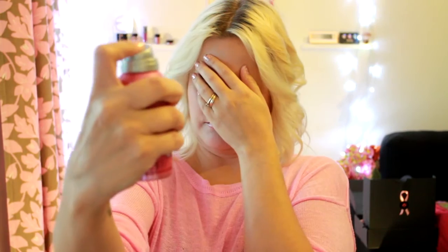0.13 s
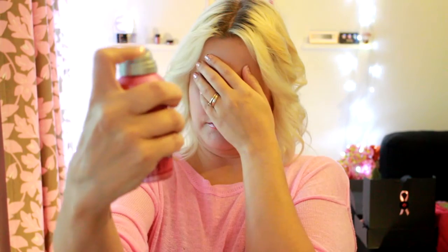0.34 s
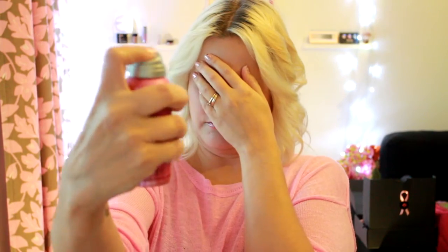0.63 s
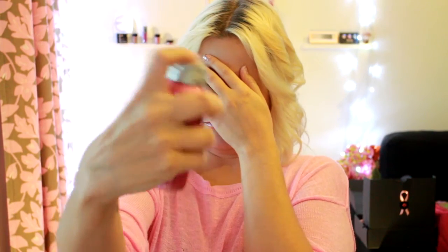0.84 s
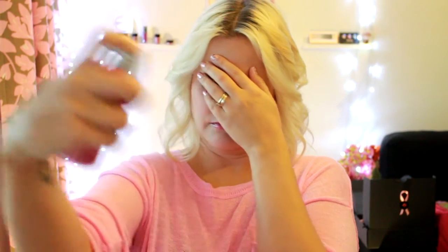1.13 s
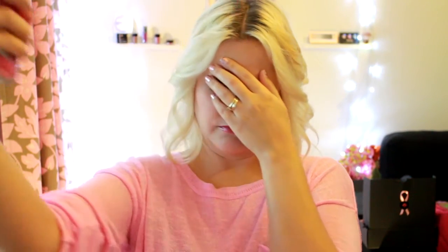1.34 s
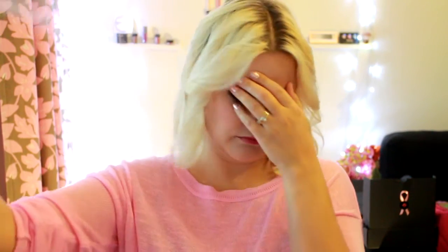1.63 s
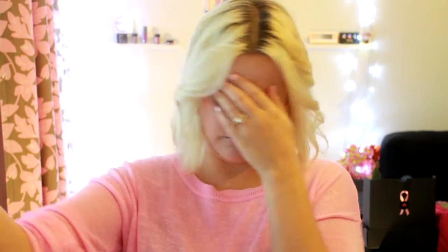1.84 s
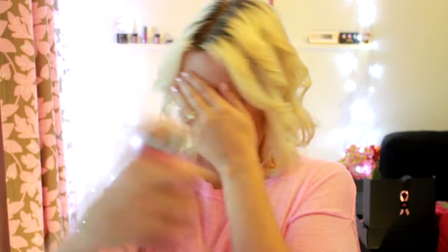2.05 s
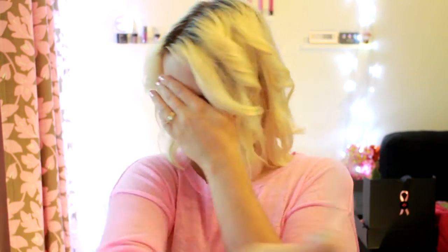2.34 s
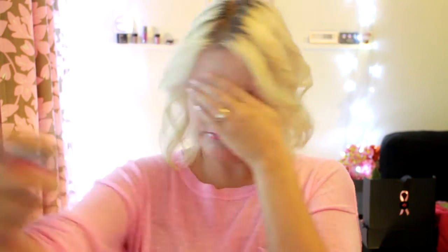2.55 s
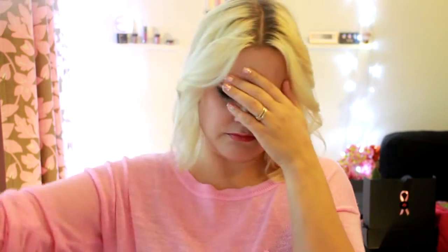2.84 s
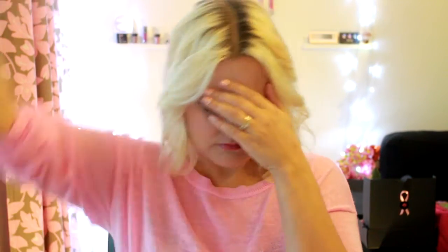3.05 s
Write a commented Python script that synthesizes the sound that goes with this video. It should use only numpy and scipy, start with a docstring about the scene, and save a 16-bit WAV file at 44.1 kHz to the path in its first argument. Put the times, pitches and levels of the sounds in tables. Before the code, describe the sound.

Close aerosol hairspray: a nozzle click, four quick hissing puffs and a longer hiss.

```python
"""A can of hairspray, close to the microphone in a small room: four short puffs, then a longer spray.
Each is a turbulent jet that hisses from the nozzle and dies away in the room. On the first press
the stiff nozzle snaps down, rattles the cap and rings the can. A low room rush and mains hum
lie behind it, all picked up by a small two-port microphone."""
import sys
import numpy as np
from scipy import signal
from scipy.fft import rfft, irfft, next_fast_len
from scipy.io import wavfile
from scipy.ndimage import map_coordinates

SR = 44100
rng = np.random.default_rng(int(sys.argv[2]) if len(sys.argv) > 2 else 0)


def int16_out(signal):
    """Quantize to a 16-bit WAV file."""
    q = np.round(np.clip(np.atleast_2d(signal).T, -1, 1) * 32767)
    wavfile.write(sys.argv[1], SR, q.astype(np.int16))


N = 141120


def sprays():
    """The valve leaks, opens with a spurt and lets out a turbulent jet until it closes."""
    # Each row: valve opens and starts closing in seconds, level in dB, treble tilt in dB per octave,
    # swell at mid-spray in dB.
    presses = [(0.23, 0.396, -36, 0.3, 1), (0.633, 0.802, -35.5, 0.04, -0.5),
               (1.215, 1.346, -37, 0.34, 1.5), (1.473, 1.665, -38, 0, 1), (2.233, 2.953, -37, 0.44, 2)]
    # The hiss of the jet. Each row: frequency in Hz, relative spectral density in dB.
    jet_spectrum = [(100, -35.5), (350, -4.5), (900, -8), (1750, -5), (2200, -10), (2900, -11), (4300, -6),
                    (5800, -7), (7800, -3.5), (9400, -0.5), (10500, -1), (11600, -6.5), (13800, -12),
                    (15600, -11.5)]
    # Its spread at the microphone. Each row: frequency in Hz, side over mid in dB.
    jet_width = [(300, -25), (1500, -14), (2800, -45), (4300, -17.5), (6500, -10.5), (9000, -9.5),
                 (10500, -4.5), (11600, 3.5), (13500, 6.5), (15600, -2)]
    # Its lean to one side. Each row: frequency in Hz, left over right in dB.
    jet_balance = [(300, 2.5), (700, 4), (2400, 0), (4400, 0), (8500, -2), (13000, -1)]
    open_s, close_s = .033, .039  # travel of the valve
    leak_s, leak_db = .01, -16.5
    spurt_db, settle_s, rise_db_per_s = 4, .059, 1
    whistle_hz, whistle_width_hz, whistle_db = 9340, 180, -14.5  # a narrow resonance of the nozzle
    flutter_db, sway_db, wet_db = .35, .2, -4
    t, jet = np.arange(N) / SR, np.zeros((2, N))
    whistle = lambda hz: 1 + amp(whistle_db) / (1 + (2 * (hz - whistle_hz) / whistle_width_hz) ** 2)
    for opens, closes, db, tilt_db, swell_db in presses:
        age = np.maximum(t - opens, 0)
        leak = amp(leak_db) * (t > opens - leak_s)
        valve = np.minimum(leak + age / open_s, 1) * np.clip(1 - (t - closes) / close_s, 0, 1)
        arch = np.sin(np.pi * np.minimum(age / (closes - opens), 1))
        level_db = db + spurt_db * np.exp(-age / settle_s) + rise_db_per_s * age + swell_db * arch
        flow = valve * amp(level_db + flutter_db * wobble(60) + sway_db * wobble(7.78))
        colour = lambda hz: whistle(hz) * amp(along(jet_spectrum, hz) + tilt_db * np.log2(hz + 1))
        jet += flow * unit(filtered(rng.standard_normal((2, N)), colour))
    heard = (jet + amp(wet_db) * moving_room(jet[0])) / np.hypot(1, amp(wet_db))
    lean = lambda hz: amp(along(jet_balance, hz) * np.array([[.5], [-.5]]))
    return filtered(stereo(heard, jet_width), lean)


def nozzle_snap():
    """One hard snap rattles the cap, rings the can and comes back from near surfaces and the room."""
    # The snap straight at the microphone. Each row: frequency in Hz, relative spectral density in dB.
    direct_spectrum = [(50, -44), (250, -15.5), (500, -11), (800, -2.5), (1150, -3), (1750, 0.5),
                       (3100, -9), (4000, 2.5), (5000, -4.5), (5700, -13), (7400, 1.5), (9200, -9.5),
                       (10300, -6), (12000, -16), (15500, -13.5)]
    # The snap as it spreads into the room, with the same columns.
    around_spectrum = [(50, -40), (250, -17), (500, -10.5), (820, -3), (1150, -4.5), (1750, 1.5), (2600, 1),
                       (3300, -2), (4200, 1), (5700, -7), (7500, -0.5), (10200, -4), (12000, -13),
                       (15500, -15)]
    # Its stereo spread. Each row: frequency in Hz, side gain in dB.
    snap_width = [(500, -13), (2000, -8), (5500, -9), (8000, -9), (11500, 5), (15000, 6)]
    # Modes of the can. Each row: frequency in Hz, relative level in dB, seconds to fall 60 dB.
    can_modes = [(1300, -9, .35), (1690, -6.5, 0.53), (1774, 2.5, 0.2), (1923, -14, 0.48),
                 (2475, -4.5, 0.32), (4020, -9, 0.24), (7500, -20, .2), (7565, 1, .25), (9700, -6, 0.14),
                 (10100, -5, .14)]
    snap_s, snap_db, can_db, wet_db = .2222, 7.5, -29.5, -4.5
    rattle_db, rattle_t60_s = -4.5, .012  # the plastic cap chatters
    bass_lag_s = .0004
    echo_s, echo_spread_s, echo_db = .0054, .0046, -7.5  # one dense cluster from near surfaces
    off_axis_db = -10  # the direct snap is narrower than its reverberation
    t = np.arange(SR // 2) / SR
    ring = sum(amp(db - 60 * t / t60) * np.cos(2 * np.pi * hz * t) for hz, db, t60 in can_modes)
    contact = (t == 0) + amp(rattle_db) * scatter(amp(-60 * t / rattle_t60_s))
    snap = amp(snap_db) * placed(signal.fftconvolve(contact, crack(direct_spectrum)), snap_s)
    snap = filtered(snap, lambda hz: np.exp(-2j * np.pi * bass_lag_s * hz * (1 - hz / SR)))
    echoes = signal.fftconvolve(snap, scatter(t < echo_spread_s))
    mid = snap + amp(echo_db) * placed(echoes, echo_s) + amp(can_db) * placed(ring, snap_s)
    side = amp(off_axis_db) * filtered(mid, lambda hz: 1j)  # a quarter cycle out of phase
    around = amp(snap_db + wet_db) * placed(crack(around_spectrum), snap_s)
    return stereo(np.array([mid, side]) + room(around), snap_width)


def room(x, gap_s=.006):
    """The small room's reverberation of x, as unrelated mid and side; the top treble dies first."""
    # Each row: frequency in Hz, seconds to fall 60 dB.
    decay_times = [(200, 0.31), (1500, 0.54), (4000, 0.4), (9000, 0.32), (15000, 0.19)]
    hz, t, noise = signal.stft(rng.standard_normal((2, SR // 2)), SR, nperseg=256)
    decay = amp(-60 * t / along(decay_times, hz)[:, None])
    tail = signal.istft(noise * decay, SR, nperseg=256)[1]
    tail /= np.linalg.norm(tail[0])
    return signal.fftconvolve(placed(x, gap_s)[None], tail, axes=1)[:, :N]


def moving_room(x, change_s=.252):
    """The room's answer to the moving can: each stretch of x fades into a new reverberation."""
    step = np.arange(N) / SR / change_s
    fades = [np.cos(np.pi / 2 * np.clip(step - k, -1, 1)) for k in range(int(step[-1]) + 2)]
    return sum(room(x * fade) for fade in fades)


def room_rush(mid_db=-50.5):
    """The steady low rush of the room, with microphone hiss on top."""
    # Each row: frequency in Hz, relative spectral density in dB.
    rush_spectrum = [(25, -21), (45, 0), (80, -17), (130, -4.5), (180, -5.5), (310, 2.5), (430, -2),
                     (700, -1.5), (1100, -8), (1600, -9.5), (2200, -17), (4000, -24.5), (9000, -32),
                     (12500, -29), (15500, -27.5)]
    # Each row: frequency in Hz, side over mid in dB.
    rush_width = [(40, -10), (110, 1), (300, -10), (1000, -5), (2200, 0), (5000, 3), (15000, 0)]
    rush = unit(filtered(rng.standard_normal((2, N)), lambda hz: amp(along(rush_spectrum, hz))))
    return amp(mid_db) * stereo(rush, rush_width)


def hum():
    """Mains hum and two faint machine tones, dead centre, wavering and slowly growing."""
    # Each row: frequency in Hz, starting level in dB, waver in dB, rise in dB per second.
    hum_lines = [(51, -68.5, 2.5, 2), (317, -62.5, 0.5, 0.5), (500, -67.5, 1.5, 1.5)]
    t, tones = np.arange(N) / SR, np.zeros(N)
    for hz, db, waver_db, rise_db_per_s in hum_lines:
        tone = np.sin(2 * np.pi * hz * t + .53 * wobble(8))
        tones += amp(db + rise_db_per_s * t) * unit(tone * amp(waver_db * wobble(6.74)))
    return tones


def amp(db):
    """Decibels to gain."""
    return 10 ** (np.asarray(db) / 20)


def unit(x):
    """x scaled to rms 1."""
    return x / np.sqrt(np.mean(x ** 2) + 1e-20)


def along(points, hz):
    """(Hz, value) points read on a log frequency axis."""
    knot_hz, values = np.transpose(points)
    return np.interp(np.log(hz + 1), np.log(knot_hz + 1), values)


def wobble(rate):
    """A smooth random curve, rate knots a second."""
    return map_coordinates(rng.standard_normal(int(N * rate / SR) + 4), [np.arange(N) * rate / SR])


def filtered(x, response):
    """x through a response given as a function of Hz."""
    size = next_fast_len(N + SR // 2)
    return irfft(rfft(x, size) * response(np.fft.rfftfreq(size, 1 / SR)), size)[..., :N]


def crack(spectrum, size=2048):
    """The shortest causal pulse with this spectrum, energy 1."""
    cepstrum = irfft(np.log(amp(along(spectrum, np.fft.rfftfreq(size, 1 / SR)))))
    fold = np.r_[1, np.full(size // 2 - 1, 2), np.zeros(size // 2)]  # to minimum phase
    pulse = irfft(np.exp(rfft(cepstrum * fold)))
    return pulse / np.linalg.norm(pulse)


def scatter(envelope):
    """A burst of dense random impulses under an envelope, energy 1."""
    burst = envelope * rng.standard_normal(len(envelope))
    return burst / np.linalg.norm(burst)


def placed(x, start_s):
    """x starting at start_s in a silent track."""
    return np.pad(x, (max(round(start_s * SR), 0), N))[:N]


def stereo(pair, width):
    """Left and right from a mid and a side signal, the side weighted by frequency."""
    side = filtered(pair[1], lambda hz: amp(along(width, hz)))
    return np.array([pair[0] + side, pair[0] - side])


def scene():
    """The can up close, the room tone behind it."""
    return sprays() + nozzle_snap() + (room_rush() + hum())


def record(dry):
    """The microphone has one narrow notch and a steep band limit."""
    notch_hz, notch_width_hz = 11120, 280
    top_hz, edge_hz = 15770, 160
    notch = lambda hz: (notch_hz ** 2 - hz ** 2) / (notch_hz ** 2 - hz ** 2 + 1j * hz * notch_width_hz)
    return filtered(dry, lambda hz: notch(hz) * np.clip((top_hz - hz) / edge_hz + .5, 0, 1))


dry = scene()
out = record(dry)
int16_out(out)
```